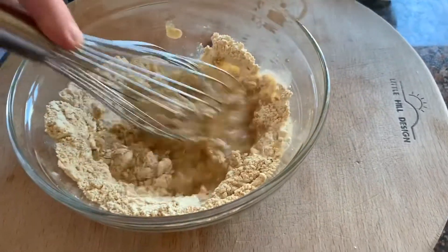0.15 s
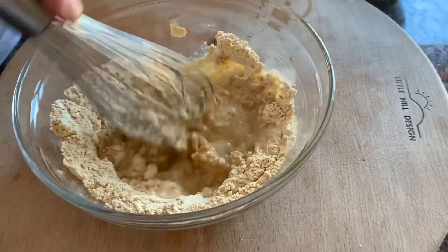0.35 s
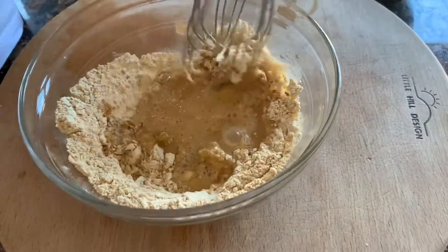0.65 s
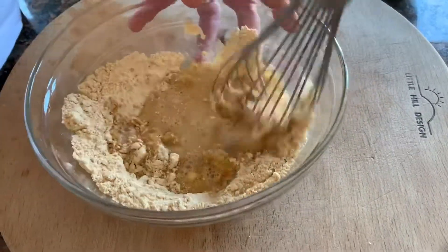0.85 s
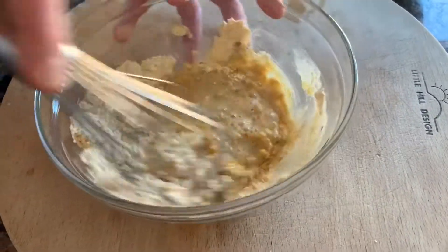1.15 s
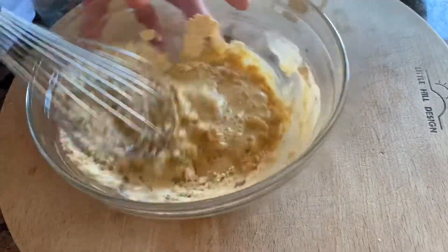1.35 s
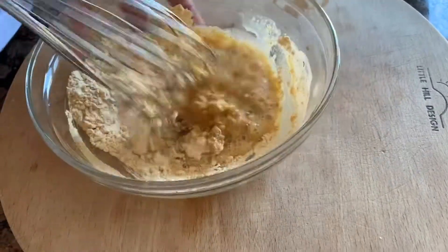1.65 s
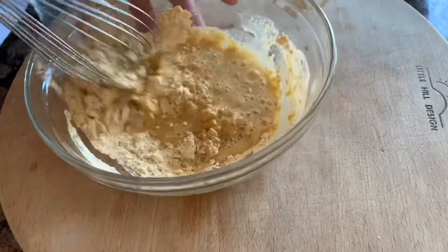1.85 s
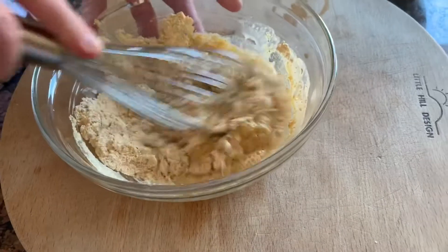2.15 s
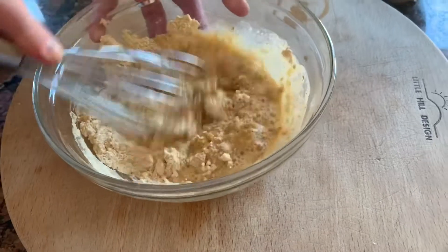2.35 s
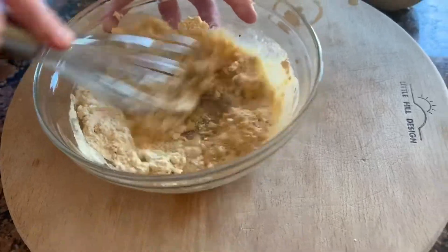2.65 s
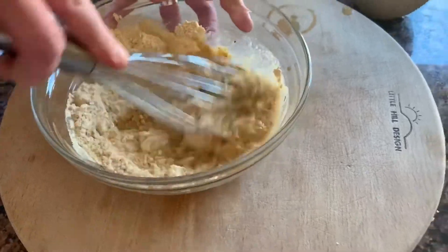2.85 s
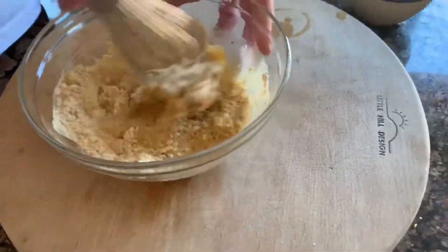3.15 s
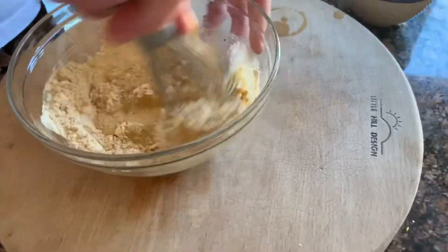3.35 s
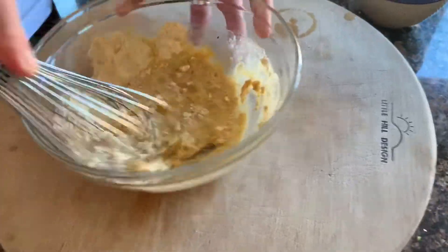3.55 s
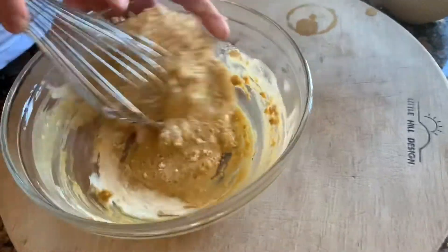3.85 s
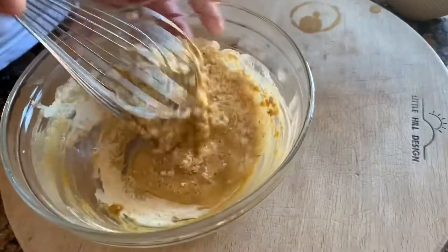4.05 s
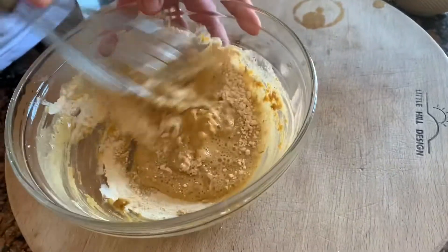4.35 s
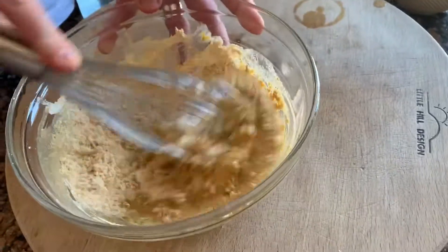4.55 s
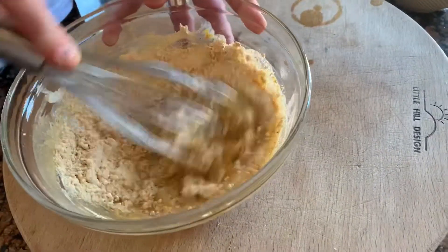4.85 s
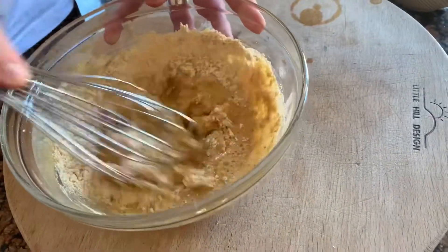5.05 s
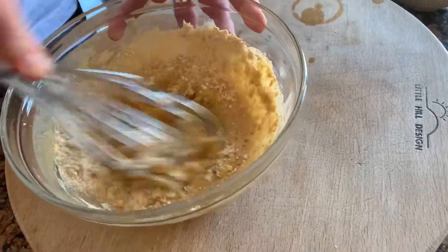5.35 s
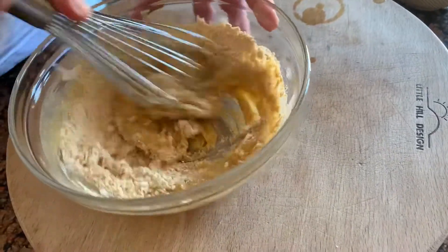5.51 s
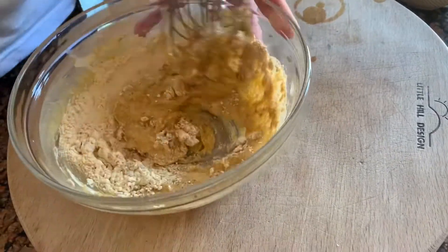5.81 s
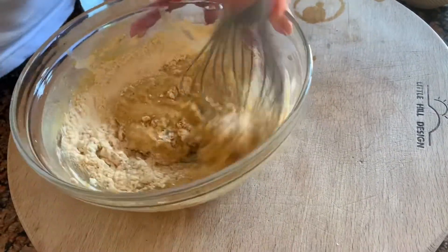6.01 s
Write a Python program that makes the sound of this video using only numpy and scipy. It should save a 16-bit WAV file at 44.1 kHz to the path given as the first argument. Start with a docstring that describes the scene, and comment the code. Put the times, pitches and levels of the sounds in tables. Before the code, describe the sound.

Close stereo microphones in a fairly dry kitchen catch a wire whisk turning thick, floury batter in a glass bowl. A metal pan is set down nearby almost at once, bouncing briefly. The bowl then rocks on its wooden board with quick knocks, quiet rustling follows, a bright scrape rings along the bare glass midway, and later strokes bring sharp wire ticks, short rasps and low counter thuds.

```python
"""Batter rustles and slumps under a wire whisk, a wire ticks, and at once a pan is set down nearby.
The glass bowl slides and rocks on a wooden board, close to a pair of microphones: its foot judders, the
board knocks, the counter thuds, and wires rasp and clink on the wall. Clicks and noise drive filters and
ringing modes of glass, wood and sheet metal; a sparse, decaying echo is the kitchen's answer."""
import sys
import numpy as np
from scipy import signal
from scipy.fft import rfft, irfft
from scipy.io import wavfile
from scipy.ndimage import uniform_filter1d

SR = 44100
rng = np.random.default_rng(int(sys.argv[2]) if len(sys.argv) > 2 else 0)


def store_wav(level_fs):
    """Save 16-bit WAV to argv[1]."""
    pcm = np.round(np.clip(np.atleast_2d(level_fs), -1, 1) * 32767)
    wavfile.write(sys.argv[1], SR, pcm.T.astype(np.int16))


N = 272475

# The whisk ploughs the batter and drags the bowl. Each row: time in seconds, level of the drag's dull part
# in dB, its sharp part against the dull in dB, rustle level in dB.
STIR = [(0.0, -70, 9.5, -65.5), (.15, -65, 4, -61), (.5, -66, 15, -67.5), (.69, -52, -11, -62),
        (.93, -66, -5, -67), (1.15, -66, 0.5, -66), (1.39, -50.5, -2, -67), (1.56, -72, -7.5, -72),
        (1.85, -81.5, 2.5, -76.5), (2.45, -61.5, -6.5, -63), (3.06, -66, 5, -60.5),
        (3.3, -67.5, 0.5, -68.5), (3.68, -47, -0.5, -57), (3.99, -68, -3.5, -70), (4.2, -75.5, -19, -81),
        (4.3, -60.5, -2.5, -67), (4.48, -65, -2, -58), (4.68, -69.5, 1, -62), (5.08, -67.5, 1.5, -60),
        (5.45, -63, -0.5, -60.5), (5.7, -65, -6, -69), (6.18, -64, -0.5, -65)]
# Modes of the wooden board. Each row: frequency in Hz, level in dB, time to fall 60 dB in seconds.
BOARD = [(183.5, 4, 0.13), (359, 3, 0.034), (467, 1, 0.067), (578.4, 1.5, 0.076), (1015, -10, 0.022),
         (1510, -11, 0.062)]


def amp(db):
    """Decibels to gain."""
    return 10 ** (np.asarray(db) / 20)


def evened(x):
    """Scales to rms 1."""
    return x / np.sqrt(np.mean(x ** 2) + 1e-30)


def read(points, hz):
    """Reads a table on a log-frequency axis, flat beyond its ends."""
    f, value = np.transpose(points)
    return np.interp(np.log(hz + 1), np.log(f + 1), value)


def along(curve):
    """The columns of a curve over time, sample by sample."""
    s, *columns = np.transpose(curve)
    return [np.interp(np.arange(N) / SR, s, column) for column in columns]


def add(mix, s, sound):
    """Mixes a sound in at time s."""
    part = mix[round(s * SR):][:len(sound)]
    part += sound[:len(part)]


def band_pass(x, edge, kind):
    """Keeps one part of the spectrum."""
    order = 2 if kind == "band" else 4
    return signal.sosfilt(signal.butter(order, edge, kind, fs=SR, output="sos"), x)


def coloured(x, points):
    """Causal filter with the given spectrum: the phase follows from the log gain."""
    gain_db = np.maximum(read(points, np.fft.rfftfreq(4096, 1 / SR)), -90)
    half = np.log(amp(gain_db))
    log_gain = np.concatenate([half, half[-2:0:-1]])
    minimum_phase = np.exp(np.conj(signal.hilbert(log_gain)))
    taps = np.fft.ifft(minimum_phase).real[:2048]
    return signal.oaconvolve(x, taps / np.linalg.norm(taps))[:len(x)]


def ring(modes, seconds, spread_db, damping=1, split=0.0029):
    """One blow: each mode is a close, beating pair, its strength and its split varying by chance."""
    hz, db, t60 = np.transpose(modes)[:, :, None]
    t = np.arange(round(seconds * SR)) / SR
    strength, detune = rng.standard_normal((2, len(modes), 1))
    pair = np.sin(2 * np.pi * hz * t) + 0.6 * np.sin(2 * np.pi * hz * (1 + split * detune) * t)
    fall_db = 60 * t * damping / np.clip(t60, .01, .25)  # decay limits in seconds, before damping
    sound = amp(db + spread_db * strength - fall_db) * pair
    return sound.sum(0) / np.linalg.norm(amp(db))


def grains(per_s, spread_db, size=N):
    """Sparse clicks of random sign, a few of them large."""
    height, sign, chance = rng.random((size, 3)).T
    sizes = amp(spread_db * np.minimum(-np.log(height + 1e-9), 4)) * np.sign(sign - .5)
    return evened(sizes * (chance < per_s / SR))


def lumps(size):
    """Slow chance, about size samples a lump."""
    once = uniform_filter1d(rng.standard_normal(N), size)
    return evened(uniform_filter1d(once, size))


def crumbs():
    """Rustle: each size of crumb has its own band, comes in uneven lumps and now and then ticks."""
    # Spectrum of the rustle. Each row: frequency in Hz, relative level in dB per Hz.
    rustle_shape = [(1180, -12.5), (2000, -1.5), (2310, -5.5), (3020, -6), (5860, -10), (8260, -6.5),
                    (9310, -16), (12700, -16), (15600, -20.5)]
    out, edges, shared = np.zeros(N), np.geomspace(1000, 18000, 8), lumps(size=500)
    for band in zip(edges, edges[1:]):
        swell = amp(0.61 * shared + 2.7 * lumps(size=900))
        hiss = swell * (rng.standard_normal(N) + .5 * grains(63, 4.5))
        out += np.sqrt(band[1] - band[0]) * evened(band_pass(hiss, band, "band"))
    return evened(coloured(out, rustle_shape))


def stirring():
    """The bowl foot judders on wood and sets the board humming, crumbs rustle: two unrelated strands."""
    # Spectrum of the judder. Each row: frequency in Hz, relative level in dB per Hz.
    drag_shape = [(65, -42.5), (110, 1.5), (189, 10.5), (408, -3.5), (546, -9.5), (606, -10.5),
                  (1820, -20.5), (2000, -30), (2600, -30), (3380, -51), (5720, -120)]
    drag_db, bright_db, rustle_db = along(STIR)
    strands, board = [], ring(BOARD, 0.18, 1.3)
    for _ in range(2):
        slips = grains(900, 1.0)
        hum = evened(signal.oaconvolve(slips, board)[:N])
        judder = coloured(slips, drag_shape) + 0.53 * hum
        dull = evened(band_pass(judder, 750, "low") * amp(2.8 * lumps(size=1200)))
        sharp = evened(band_pass(judder, 750, "high") * amp(1.0 * lumps(size=800)))
        drag = dull + amp(bright_db) * sharp
        strands.append(amp(drag_db) * drag + amp(rustle_db) * crumbs())
    return np.array(strands)


def thudding():
    """Deep shocks swell fast and die slower over a rumble, each rocking the counter near its pitch."""
    # Shocks through the counter, one as each stroke turns. Each row: peak time in seconds, level in dB.
    counter_shocks = np.array([(0.149, -49), (.24, -50), (.62, -65), (.72, -61), (1.4, -56.5), (1.83, -64),
                               (1.958, -61), (2.13, -67), (3.27, -56), (3.668, -57), (4.291, -49.5),
                               (4.42, -52.5), (4.65, -50), (4.861, -50.5), (5.099, -56), (5.36, -51.5),
                               (5.64, -59), (5.76, -58.5), (5.87, -60), (6.12, -54.5)])
    # Spectrum of the noisy part. Each row: frequency in Hz, relative level in dB per Hz.
    thud_shape = [(15, -50), (25, -15.5), (41, -10.5), (59, -3), (72, -6.5), (113, -10.5), (130, -9.5),
                  (170, -21), (290, -120)]
    rise_db_per_s, fall_db_per_s = 491.5, 202
    late = np.arange(N) / SR - counter_shocks[:, :1]
    swell_db = np.minimum(rise_db_per_s * late, -fall_db_per_s * late)
    shocks = amp(counter_shocks[:, 1:] + swell_db)
    rumble_db = -70 + 0.16 * (along(STIR)[0] + 65)  # the rumble follows the drag a little
    tune, turn = rng.random((len(counter_shocks), 2)).T[:, :, None]
    pitch_hz = 63.3 * (0.94 + .3 * tune)
    rocking = shocks * np.sin(2 * np.pi * (pitch_hz * late + turn))
    noise = coloured(rng.standard_normal(N), thud_shape)
    return 1.04 * rocking.sum(0) + (.6 * shocks.max(0) + amp(rumble_db)) * noise


def slumps():
    """Batter bumps, slumps and swishes wetly: narrow noise wobbles round one pitch under a soft swell."""
    # Each row: start in seconds, length in seconds, level in dB, pitch in Hz.
    batter_slumps = [(0.095, 0.047, -40.5, 503), (0.101, 0.063, -48.5, 162), (2.249, 0.056, -60.5, 2260),
                     (2.501, 0.043, -58.5, 139), (2.508, 0.035, -64, 2180), (2.862, 0.082, -60.5, 2260),
                     (2.572, 0.11, -52.5, 218), (2.576, 0.072, -56, 420), (3.24, 0.042, -56, 202),
                     (3.673, 0.12, -44.5, 202), (4.238, 0.041, -58, 517), (4.265, 0.02, -62, 172),
                     (4.291, 0.032, -48, 220), (4.455, 0.023, -59, 158), (5.739, 0.071, -54.5, 196)]
    out = np.zeros(N)
    for s, length, level_db, hz in batter_slumps:
        size = round(max(length, .01) * SR)
        peak = [(hz * .3, -35), (hz * 0.81, -10), (hz, 0), (hz * 1.11, -10), (hz * 3, -28), (hz * 8, -70)]
        wobble = coloured(rng.standard_normal(8000), peak)[-size:]
        add(out, s, amp(level_db) * evened(wobble) * signal.windows.tukey(size, .7))
    return out


def ticks():
    """Wires crack on each other and on crumbs, each at its own pitch; small random ones follow the rustle."""
    # The clearest ticks. Each row: start in seconds, blow in dB, pitch in Hz.
    wire_ticks = [(0.148, -41.5, 4750), (0.5177, -40, 3320), (0.595, -37, 5630), (1.0112, -41.5, 7350),
                  (1.1875, -23.5, 12600), (1.1881, -30, 3720), (1.628, -46.5, 3480), (2.364, -43, 7890),
                  (2.5095, -35.5, 7900), (2.6152, -41, 6200), (2.8928, -40, 4800), (3.235, -42, 12100),
                  (3.3069, -43.5, 9000), (3.3536, -38, 8200), (3.387, -41, 5400), (3.452, -40.5, 10100),
                  (3.6054, -33, 4590), (4.3871, -16.5, 8220), (4.708, -42.5, 10200), (4.847, -49, 8120),
                  (4.9224, -25, 5540), (5.0752, -40.5, 4400), (5.1403, -37, 4800), (5.154, -40, 10900),
                  (5.1922, -18.5, 5430), (5.237, -32, 8700), (5.3495, -40.5, 8450), (5.4995, -14, 4240),
                  (5.6, -48, 3210), (5.743, -47, 5270), (5.946, -33.5, 6550)]
    out, t = np.zeros(N), np.arange(400) / SR
    when, size, pitch = rng.random((30, 3)).T
    rustle_db = along(STIR)[2][(when * N).astype(int)]
    small_db = rustle_db + 17 + 4 * (2 * size - 1)  # 13 to 21 dB above the rustle
    small_ticks = zip(when * N / SR, small_db, 4200 * 2.7 ** pitch)
    for s, blow_db, hz in [*wire_ticks, *small_ticks]:
        crack = rng.standard_normal(len(t)) * np.minimum(t / 0.0016, 1) * amp(-60 * t / 0.011)
        peak = [(hz * 0.041, -35), (hz * 0.94, -10), (hz, 0), (hz * 1.16, -9), (hz * 1.5, -16),
                (hz * 1.9, -30)]
        add(out, s, amp(blow_db) * coloured(crack, peak))
    return out


def clanks():
    """The pan lands and bounces: a rattle of contacts and a dying buzz feed its modes and a broad clatter."""
    # Landings of the pan. Each row: start in seconds, blow in dB.
    landings = [(.2, -45.5), (0.209, -21.5), (0.226, -25.5), (.252, -33.5), (0.353, -33.5), (0.359, -27.5)]
    # Sheet metal modes. Each row: frequency in Hz, level in dB, free 60 dB decay in seconds, which
    # ring() limits and then damps.
    pan_modes = [(390, -10, 0.25), (546, -19, 1.3), (832, -13.5, 0.32), (1151, -3.5, 5.0),
                 (1357.5, -2.5, 0.21), (1734, -28.5, 0.63), (1845, -27, 0.08), (2378, -13.5, 0.63),
                 (2690, -33, 0.29), (4576, -46.5, 0.41), (7280, -29, 0.36), (8800, -23.5, 0.22),
                 (11080, -25.5, 0.151), (14150, -32, 0.1), (13900, -40.5, 0.14)]
    # Broad part of the clank. Each row: frequency in Hz, relative level in dB per Hz.
    clatter_shape = [(88, -44.5), (150, -12.5), (375, -7), (598, -15), (773, -3), (1000, -13.5),
                     (1380, -10), (1470, -8.5), (2500, -11.5), (4180, -31.5), (7000, -52.5), (9100, -83),
                     (15400, -120)]
    rattle_s, buzz_s, buzz_db, sheet_db = 0.0089, 0.082, -21.5, -2.5  # time constants, levels
    out, t = np.zeros(N), np.arange(16000) / SR
    for s, blow_db in landings:
        contacts = np.exp(-t / rattle_s) + amp(buzz_db) * np.exp(-t / buzz_s)
        rattle = rng.standard_normal(len(t)) * contacts
        sheet = ring(pan_modes, .3, 0.37, damping=4.0, split=0.02)
        add(out, s, amp(blow_db) * coloured(rattle, clatter_shape))
        ringing = signal.oaconvolve(rattle, sheet / np.linalg.norm(sheet))
        add(out, s, amp(blow_db + sheet_db) * ringing)
    return out


def knocks():
    """The board rocks and rings briefly; bending waves bring the high part first as a falling snap."""
    # Each row: start in seconds, blow in dB, change of the lowest mode in dB.
    board_knocks = [(0.52, -41, -15), (0.585, -31, -10.5), (0.618, -32.5, -6), (0.672, -30.5, -5.5),
                    (0.705, -38.5, 2), (0.751, -31.5, -13), (0.796, -42, -2), (1.803, -44, -14),
                    (1.917, -53.5, 0), (1.94, -54.5, -1), (2.114, -58, 12), (3.233, -46.5, -30),
                    (4.267, -43.5, 5), (4.328, -42, -6), (4.397, -47, -10), (4.453, -48.5, -6),
                    (5.737, -42.5, -0.5)]
    out, t = np.zeros(N), np.arange(400) / SR
    for s, blow_db, low_db in board_knocks:
        top_hz = 1300 * rng.uniform(0.736, 1.287)
        snap_hz = 150 + top_hz * np.exp(-t / 0.00341)
        swell = np.sin(np.pi * np.clip(t / 0.0064, 0, 1))
        snap = np.sin(2 * np.pi * np.cumsum(snap_hz) / SR) * swell
        tune = rng.uniform(0.92, 1.08)  # the hand's grip shifts the modes
        modes = [(hz * tune, db + low_db * (hz < 300), t60) for hz, db, t60 in BOARD]
        body = ring(modes, 0.083, 2.16)
        softened = uniform_filter1d(np.pad(body, (20, 0)), size=20)
        add(out, s, amp(blow_db) * snap)
        add(out, s + 0.0032, amp(blow_db) * softened)
    return out


def wall(low_db, middle_db, damping):
    """The bowl's answer to one touch; the place of the touch favours or mutes the lower modes."""
    # Modes of the glass. Each row: frequency in Hz, level in dB, free 60 dB decay in seconds, which
    # ring() limits and then damps.
    glass_modes = [(2110, -4, 0.32), (2140, -7, 0.14), (3305, 2.5, 0.39), (4454, -21, 0.082),
                   (4530, 1, 0.13), (6120, -8, 0.18), (7950, -6.5, .13), (7640, -16, .06), (8700, -10, 0.3),
                   (9565, -6, 0.15), (10480, -9, 0.15), (11560, -11.5, .1), (12500, -28, 0.079),
                   (13700, -24.5, .1), (13400, -21, 0.14), (14540, -9.5, 0.046), (14930, -15, 0.036)]
    modes = []
    for hz, db, t60 in glass_modes:
        touch_db = low_db * (hz < 4000) + middle_db * (4000 < hz < 5000)
        modes.append((hz, db + touch_db, t60))
    return ring(modes, .3, 1.5, np.clip(damping, 1, 8), split=0.0072)


def rasp(pressure, bare, body_db):
    """Several wires stutter along the wall: dense clicks into the glass, or muffled by batter."""
    # Spectrum of muffled wire contact. Each row: frequency in Hz, relative level in dB per Hz.
    grit_shape = [(1180, -11.5), (2000, -8.5), (3380, -3.5), (3680, -54.5), (5510, 2.5), (6660, -4.5),
                  (7200, 0), (14000, -17), (15600, -28)]
    low_coated_db, low_bare_db = 0, -20.5  # the lowest glass modes under a rasp
    top_coated_db, top_bare_db = -1, 11.5  # batter on the wall dulls the top
    bare = np.clip(bare, 0, 1)
    chatter = amp(2.5 * lumps(size=120)[:len(pressure)])  # contact breaks up every few milliseconds
    clicks = grains(7000, 2.2, size=len(pressure))
    stutter = np.pad(pressure * chatter * clicks, (0, 1000))
    low_db = low_coated_db + (low_bare_db - low_coated_db) * bare
    glass = wall(low_db, 0, 3.7 + 0.99 * (1 - bare))  # batter damps the ring
    # loaded wires ring very briefly at pitches that change with each stroke
    wire_hz = np.geomspace(2200, 14000, 9) * rng.uniform(0.77, 1.164, 9)
    wires = ring([(hz, 0, .016) for hz in wire_hz], 0.026, 3.2)
    ringing = signal.oaconvolve(stutter, wires / np.linalg.norm(wires))[:len(stutter)]
    muffled = coloured(stutter, grit_shape) + 0.8 * ringing
    sound = signal.oaconvolve(stutter * np.sqrt(bare), glass / np.linalg.norm(glass))
    add(sound, 0, muffled * np.sqrt(1 - bare))
    top_db = top_coated_db + (top_bare_db - top_coated_db) * bare
    sound = coloured(sound, [(5000, 0.022), (12000, top_db)])
    # the batter mass and the bowl body carry the low part
    body_shape = [(250, -16.5), (700, -9.5), (2000, -3.0), (3000, -12.0), (5000, -53.5)]
    add(sound, 0, coloured(stutter * amp(body_db), body_shape))
    return sound


def rasps():
    """Short rasps press on, hold and let go; one long scrape round the bare wall follows its pressure."""
    # Short rasps along the wall. Each row: start in seconds, length in seconds (5 ms at least is played),
    # pressure in dB, bare glass from 0 to 1, level of the low body part in dB.
    wall_rasps = [(0.998, 0.12, -63.5, 0.05, -19), (1.185, 0.0038, -46, 0, -42),
                  (1.784, 0.046, -50.5, 0.4, -2.5), (2.149, 0.047, -59, 0, -4.5),
                  (2.496, 0.022, -58, 0.07, -0.5), (3.213, 0.034, -55.5, 0.08, 2.5),
                  (4.238, 0.016, -60.5, 0.87, -5), (4.323, 0.014, -49, 0.9, -3.5),
                  (4.632, 0.029, -45, 0.1, -0.5), (4.897, 0.06, -46.5, 0, -1.5),
                  (5.185, 0.036, -44, 0.1, 0), (5.474, 0.037, -48, 0, 2), (5.491, 0.031, -35.5, 0.01, -7.5),
                  (5.778, 0.28, -69, 0.8, -20), (5.93, 0.054, -61.5, 0.45, -5)]
    # The long scrape. Each row: time in seconds, pressure in dB.
    scrape = [(3.48, -64), (3.52, -56.5), (3.6, -42), (3.635, -59), (3.675, -46), (3.687, -24.5),
              (3.706, -32), (3.73, -23), (3.747, -55.5), (3.85, -66), (4.0, -80)]
    out, (s, press_db) = np.zeros(N), np.transpose(scrape)
    scrape_db = np.interp(np.arange(s[0], s[-1], 1 / SR), s, press_db)
    add(out, s[0], rasp(amp(scrape_db), bare=1, body_db=-31))
    for start, length, level_db, bare, body_db in wall_rasps:
        size = round(max(length, .005) * SR)
        add(out, start, rasp(amp(level_db) * signal.windows.tukey(size, .6), bare, body_db))
    return out


def clinks():
    """Wires strike bare glass; the springy wire chatters for a few milliseconds after the first touch."""
    # Each row: start in seconds, blow in dB, change of the low modes in dB, change of the middle modes
    # in dB, damping factor.
    glass_blows = [(1.02, -57, -16, -2, 2), (1.7979, -35, -4, -15, 1.76), (3.4503, -56.5, -19, -21, 1.6),
                   (4.2986, -55, -6, -11.5, 2.9), (4.3294, -45, -17, -25, 1.7),
                   (4.3884, -35, -7.5, -4, 1.4), (4.4094, -37, -4.5, -6, 3), (5.9447, -69, -11, 0, 1.3)]
    out, t = np.zeros(N), np.arange(500) / SR
    for s, blow_db, low_db, middle_db, damping in glass_blows:
        chatter = (t == 0) + 0.06 * grains(3700, 1.0, size=len(t)) * np.exp(-t / 0.0021)
        add(out, s, amp(blow_db) * signal.oaconvolve(wall(low_db, middle_db, damping), chatter))
    return out


def kitchen(x):
    """The room's answer: sparse taps of random sign, each band dying at its own speed."""
    # Each row: frequency in Hz, time to fall 60 dB in seconds.
    room_decay = [(100, 0.54), (500, 0.25), (1500, 0.43), (4000, 0.31), (12000, 0.25)]
    taps = np.zeros((2, SR))
    at = np.arange(200, SR - 20, 20) + rng.integers(0, 20, (2, (SR - 201) // 20))
    np.put_along_axis(taps, at, rng.choice([-1., 1.], at.shape), 1)
    hz, t, bands = signal.stft(taps, SR, nperseg=256)
    fall = amp(-60 * t / read(room_decay, hz)[:, None])
    tail = signal.istft(bands * fall, SR, nperseg=256)[1]
    return signal.fftconvolve(x[None], tail / np.linalg.norm(tail[0]), axes=1)[:, :N]


def ports(direct, diffuse):
    """Both microphones hear the direct sound, and diffuse sound partly unlike; level and phase differ."""
    # The microphone pair. Each row: frequency in Hz, phase by which left leads in radians, left over right
    # in dB, unlike share of diffuse sound from 0 to 1.
    microphone_pair = [(60, -.3, 1.5, .2), (170, -.3, 2, .15), (350, -.45, 2, .25), (700, -.7, -2.5, .5),
                       (1400, -.3, -1, .6), (2400, -1.4, 2, .7), (3500, -2.8, 3, .7), (4650, -.3, 5, .6),
                       (5700, -2.7, 4, .6), (6900, -1.8, 0, .4), (8300, -1.3, -1, .15), (9700, -.9, 0, .15),
                       (11000, -.3, 0, .08), (13000, 0, 0, .02)]
    hz, (f, *columns) = np.fft.rfftfreq(N, 1 / SR), np.transpose(microphone_pair)
    lead, pan_db, unlike = (read(np.transpose([f, column]), hz) for column in columns)
    side_power = np.clip(unlike, 0, 1) / 2
    common, opposed = rfft(diffuse)
    mid = rfft(direct) + np.sqrt(1 - side_power) * common
    side = np.sqrt(side_power) * opposed
    left = amp(pan_db / 2) * np.exp(.5j * lead)
    return irfft([(mid + side) * left, (mid - side) / left], N)


def scene():
    """Bowl and board are near and fairly dry; the pan is further off and wet."""
    bowl = ticks() + clinks() + rasps()
    board = knocks() + slumps()
    pan = clanks()
    echo = kitchen(amp(-11.5) * bowl + amp(-8.0) * board + amp(-5.0) * pan)
    return ports(bowl + board + pan + thudding(), echo + stirring())


def record(dry):
    """The microphones drop the deepest bass; then a steep low-pass limits the band."""
    thin = band_pass(dry, 46, "high")
    low_pass = signal.firwin(511, 15800, window=("kaiser", 9), fs=SR)
    return signal.oaconvolve(thin, low_pass[None], "same")


dry = scene()
out = record(dry)
store_wav(out)
```